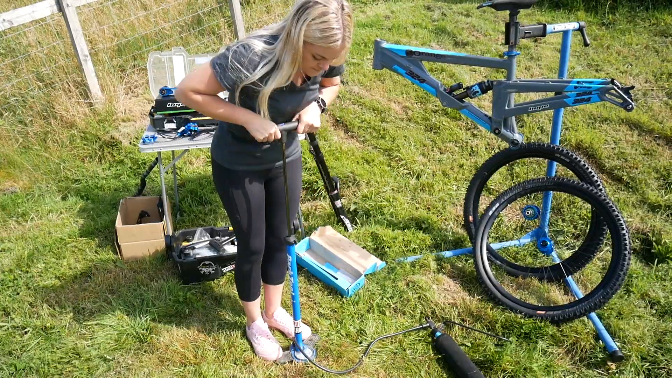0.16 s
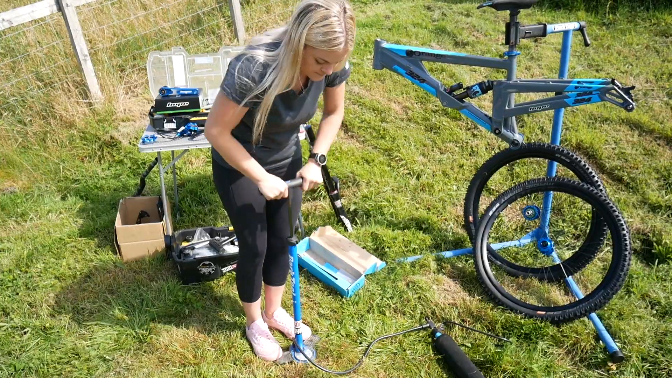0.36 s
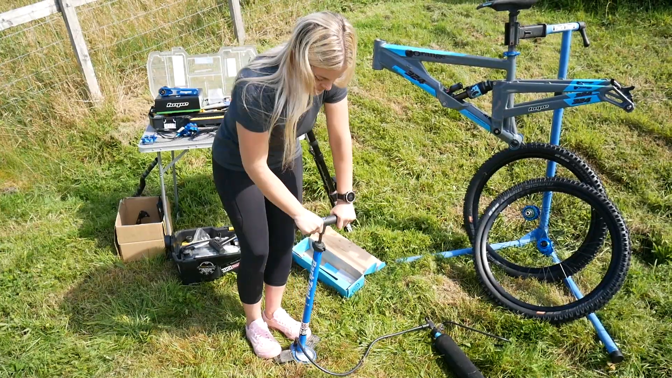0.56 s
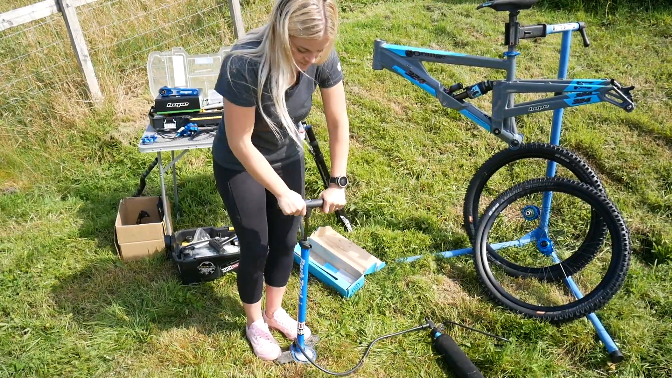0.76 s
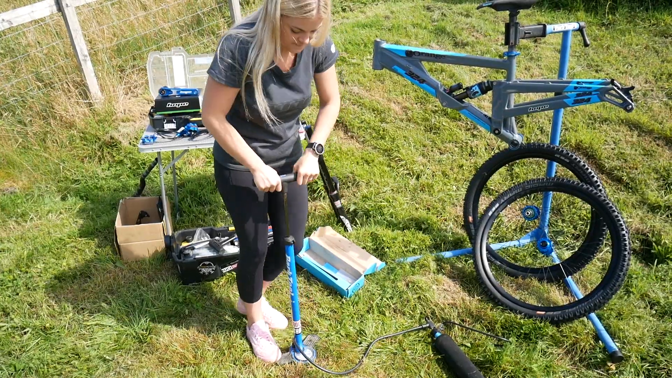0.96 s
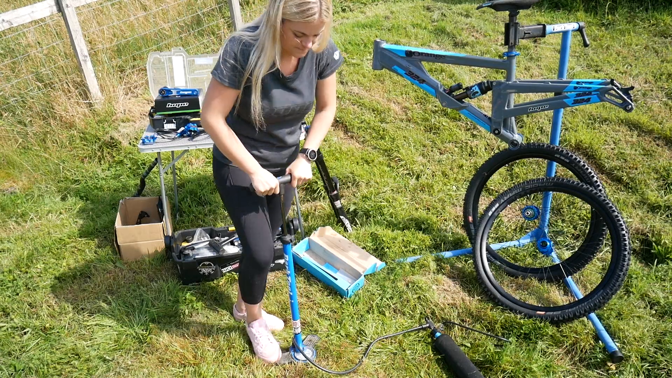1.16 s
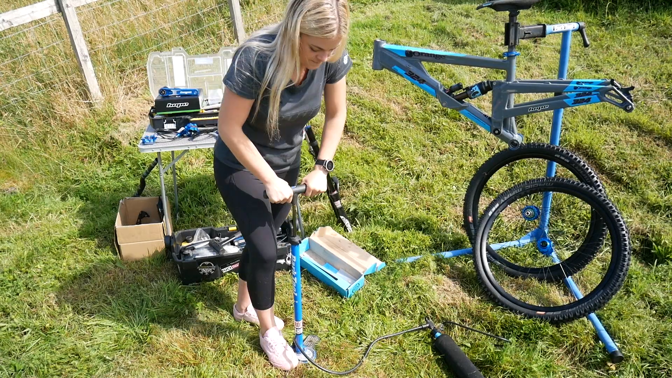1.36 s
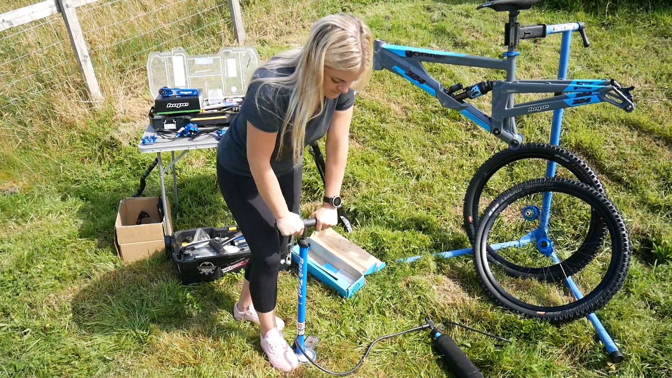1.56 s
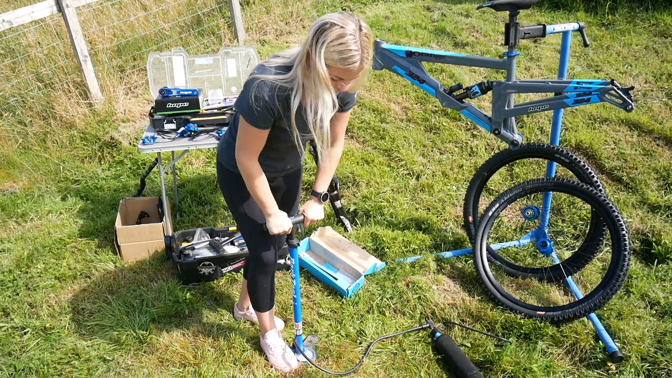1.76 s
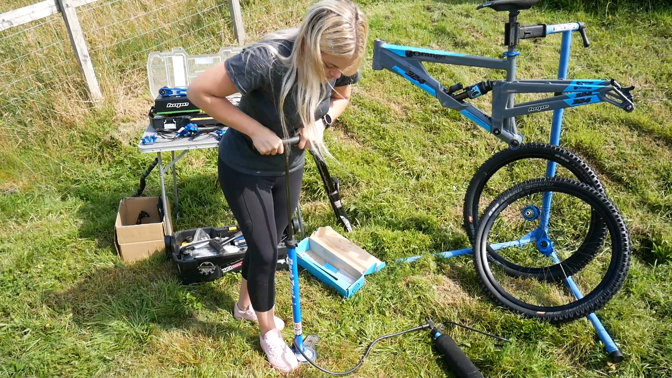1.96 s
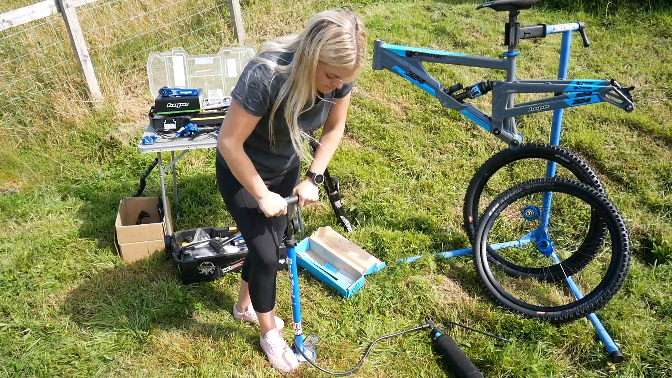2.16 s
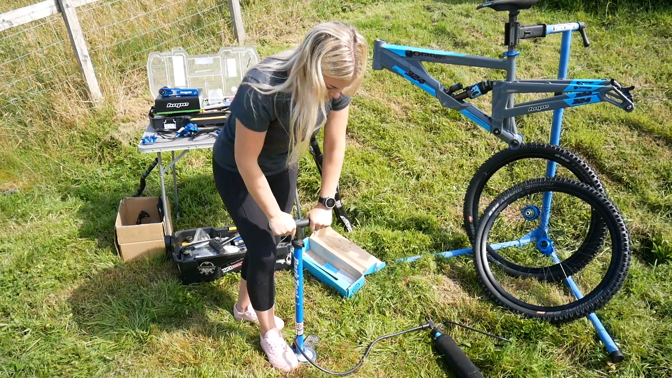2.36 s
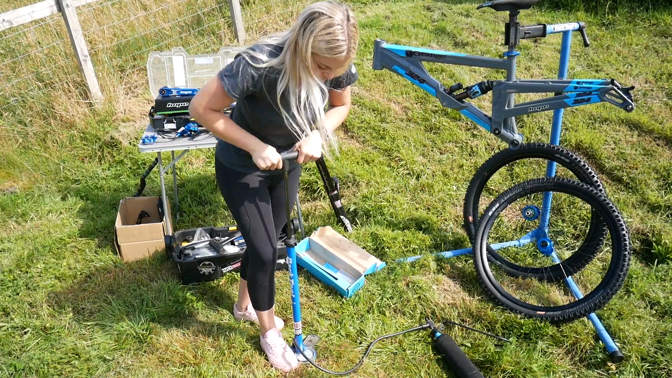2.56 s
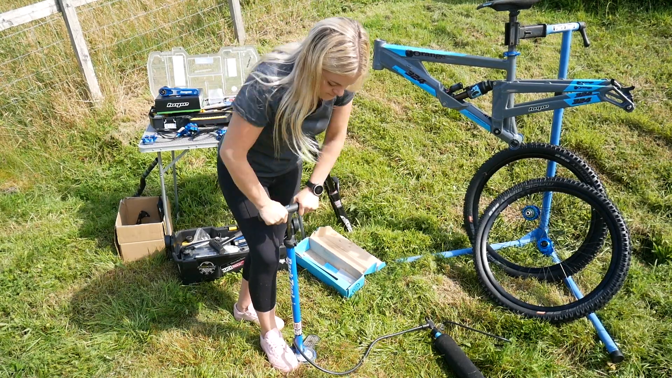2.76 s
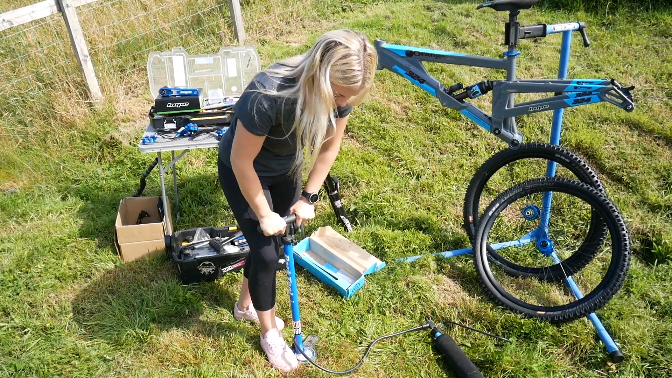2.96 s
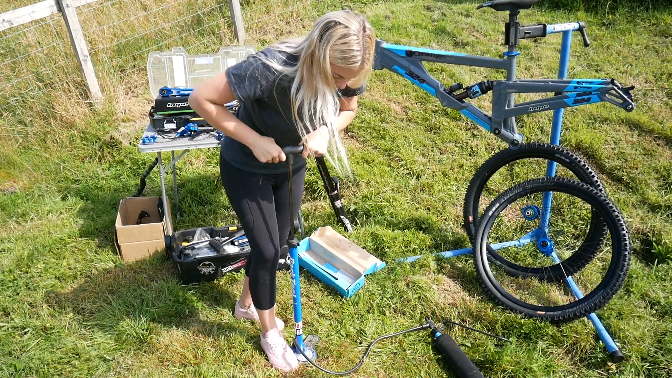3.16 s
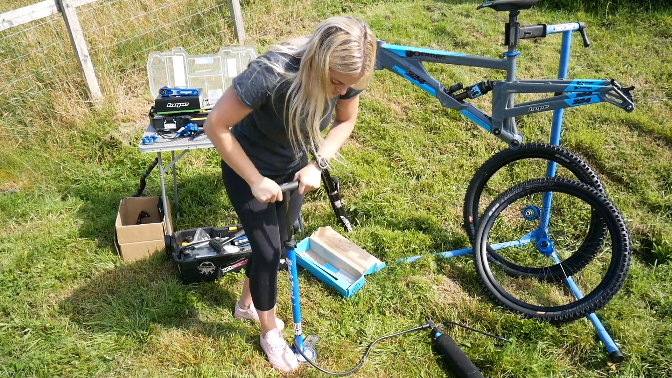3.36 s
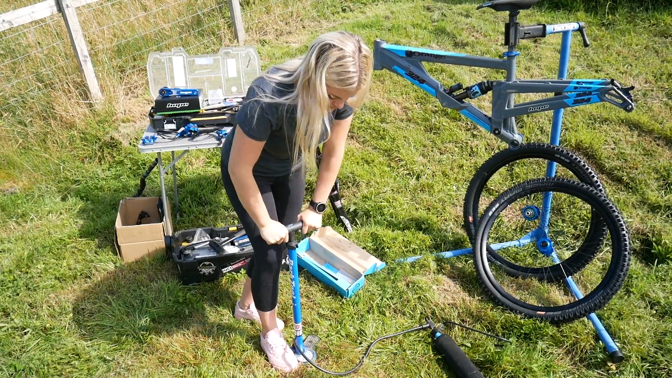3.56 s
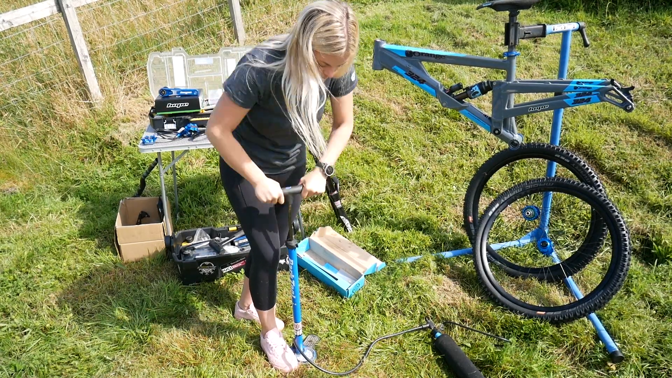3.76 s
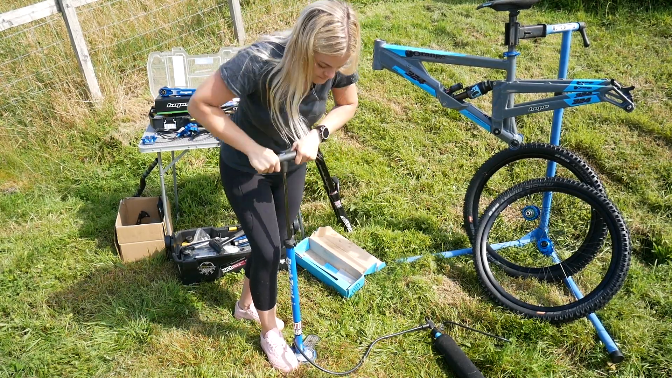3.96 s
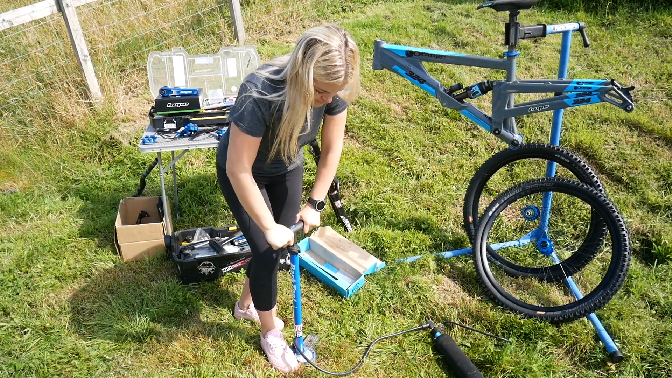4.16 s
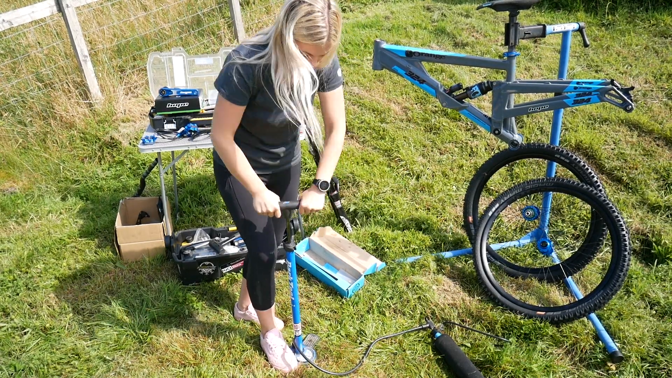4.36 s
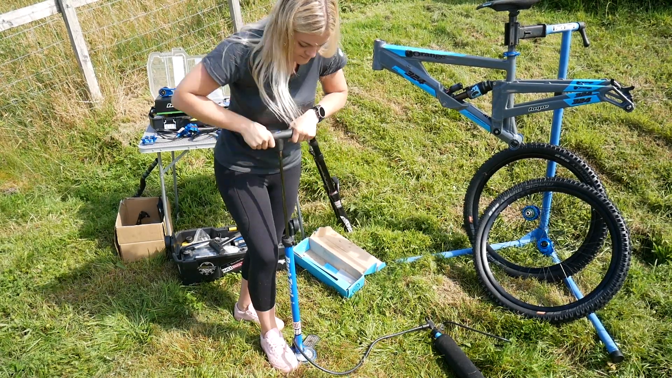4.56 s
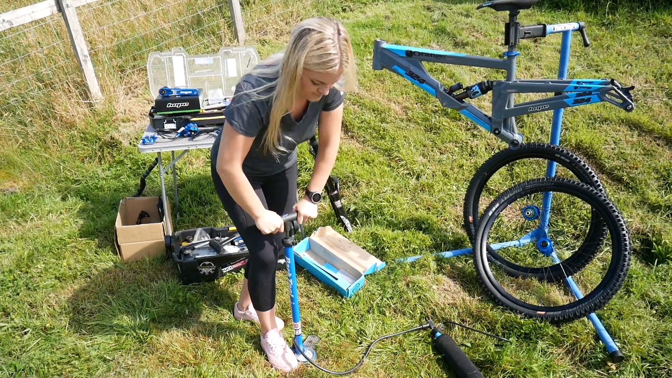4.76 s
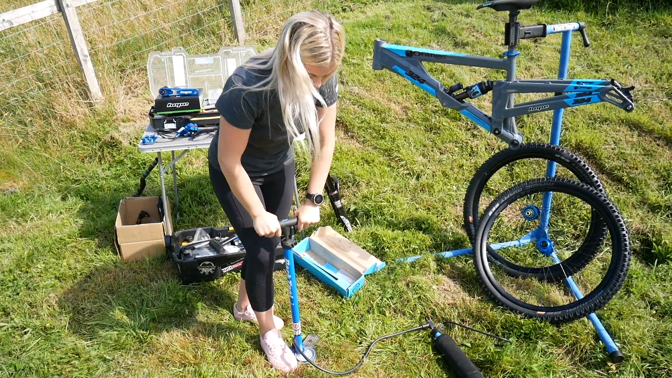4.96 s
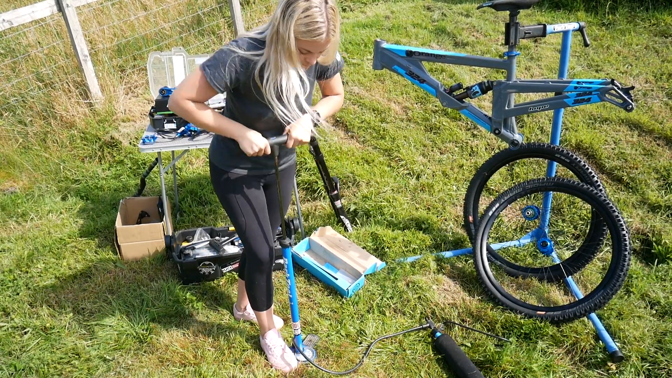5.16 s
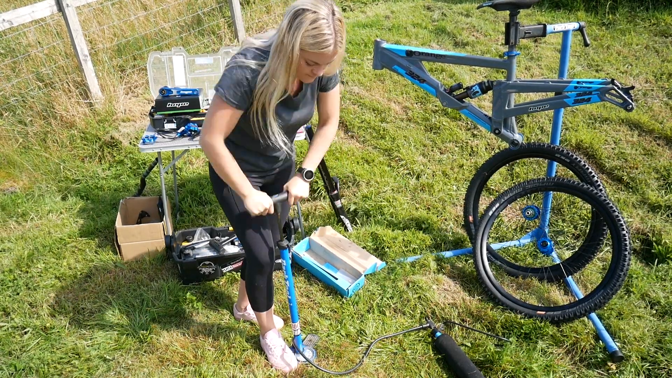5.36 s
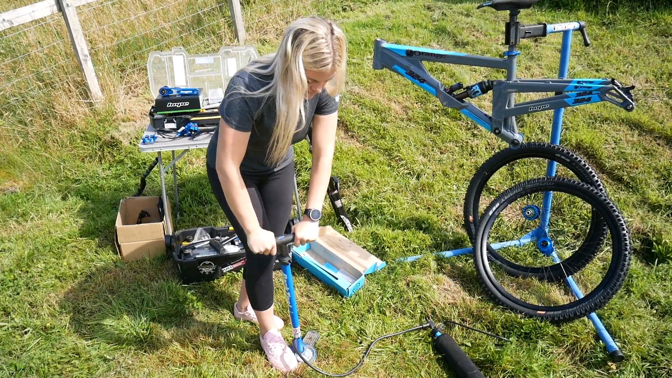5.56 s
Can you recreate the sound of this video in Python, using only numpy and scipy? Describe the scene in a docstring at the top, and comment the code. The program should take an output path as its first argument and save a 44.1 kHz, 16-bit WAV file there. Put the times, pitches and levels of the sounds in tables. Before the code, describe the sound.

A floor pump is worked on grass for about 5.6 seconds, heard close in stereo, with a dry sound and barely any reflections. Each stroke starts with a faint scuff and soft intake of air, then a push of airy hiss with a slightly rising jet tone. Late in each push the valve squeaks, around 2 kHz and falling, for 0.05 to 0.15 seconds: at about 0.47, 1.55, 2.2, 2.8, 3.45, 4.1, 4.75 and 5.4. The first two are fairly clean; the third turns fluttery at its end, and the later ones are rougher and buzzing, some settling into a cleaner note. Thin whistles rise from the squeaks at 0.47 and 2.2. The barrel rings faintly after pushes. Small knocks and clicks fall near 0.55, 1.35, 1.65, 3.7 and 4.9, with tiny low gulps after some strokes. Behind lie a quiet outdoor rush and a faint wavering low hum.

```python
"""Air is drawn in with a soft scuff as a floor pump is lifted on a lawn, then pushed out in eight quick strokes.
Each push is coloured noise with a climbing jet tone; late in it a swinging valve lip squeaks, clean or fluttering,
and two squeaks sprout thin whistles. The open valve makes the barrel ring; damped modes give knocks where the piston
hits its stop, and short low sines are the valve's gulps. Behind lie a soft outdoor rush and a faint hum."""
import sys
import numpy as np
from scipy import signal
from scipy.fft import rfft, irfft, next_fast_len
from scipy.io import wavfile
from scipy.ndimage import map_coordinates

SR = 44100
rng = np.random.default_rng(int(sys.argv[2]) if len(sys.argv) > 2 else 0)


def file_out(sig):
    """Save sig as 16-bit WAV at sys.argv[1]."""
    # one column per channel
    cols = np.atleast_2d(sig).T
    # limit, then scale
    lim = np.clip(cols, -1, 1)
    pcm = np.round(lim * 32767).astype(np.int16)
    wavfile.write(sys.argv[1], SR, pcm)


N = 247401

# valve squeaks, one a push; the lip settles as the pressure evens out: start_s, end_s, first_pitch_hz,
# settled_pitch_hz, settling_s, first_level_db, settled_level_db (both before the tone trim), first_flutter (0-1),
# later_flutter (0-1), release_s, release_droop_hz, overtone_offset_db
SQUEAKS = [(.471, 0.545, 2295, 2095, 0.023, -18, -22.5, 0.12, 0.04, 0.015, 27, -5),
           (1.549, 1.652, 2154, 1982, .045, -21, -19.5, 0.09, 0.04, 0.0024, -2, -2.5),
           (2.212, 2.347, 2110, 1838, 0.048, -15.5, -31.5, 0.01, 0.13, 0.0092, 2, 2.5),
           (2.795, 2.93, 2122, 1904, 0.0048, -17.5, -21, 0.41, 0.61, 0.031, 250, 1),
           (3.442, 3.491, 2102, 1897, 0.0057, -18.5, -23.5, 0.18, 0.87, 0.0083, 0, -4),
           (4.08, 4.232, 2276, 1799, .011, -17, -27, 0.11, 0.7, .032, 153, 3),
           (4.745, 4.804, 2027, 1870, 0.015, -16.5, -22.5, 0.19, 0.76, 0.0078, 0, 5.5),
           (5.425, 5.57, 2146, 1803, 0.012, -12, -26, 0.18, 0.48, 0.019, 34, 7)]
# downward strokes: start_s, end_s, hiss_level_db (before turbulence), barrel_ring_level_db
PUSHES = [(0.287, 0.495, -50.5, -47.5), (1.464, 1.677, -60.5, -72), (2.106, 2.319, -47, -51.5),
          (2.705, 2.906, -45.5, -51.5), (3.34, 3.501, -45, -45.5), (3.982, 4.202, -47, -52.5),
          (4.647, 4.811, -45, -44), (5.311, 5.528, -46, -61.5)]
# colour of air in the pump: frequency_hz, relative_density_db
HISS_COLOUR = [(500, -14.5), (1200, -6), (2500, -1.5), (4600, -3), (5900, -8.5), (7400, 1.5), (8600, -8),
               (10200, -10), (11800, -12), (14400, -18.5), (15300, -35.5)]
# left-right likeness of near air: frequency_hz, coherence (-1 to 1)
NEAR_LIKENESS = [(600, 0), (1400, 0.78), (3000, 1), (5000, 0.9), (7000, 0.15), (15000, 0.034)]


def amp(db):
    """Decibels to gain."""
    return 10 ** (np.asarray(db) / 20)


def unit(x):
    """x at rms 1."""
    return x / np.sqrt(np.mean(x ** 2) + 1e-20)


def along(points, hz):
    """(Hz, value) points read on a log frequency axis."""
    f, v = np.transpose(points)
    return np.interp(np.log(hz + 1), np.log(f + 1), v)


def clock():
    """The time of every sample in seconds."""
    return np.arange(N) / SR


def gate(t, start, end, rise, fall):
    """Near 1 from start to end, with soft edges."""
    return (1 + np.tanh((t - start) / rise)) * (1 + np.tanh((end - t) / fall)) / 4


def wobble(rate, size):
    """A smooth random curve, rate knots a second."""
    knots = rng.standard_normal(int(size * rate / SR) + 4)
    return map_coordinates(knots, [np.arange(size) * rate / SR])


def band(centre, width):
    """Narrow noise around a moving centre frequency; width is the knot rate of its two random envelopes."""
    phase = 2 * np.pi * np.cumsum(centre) / SR
    return wobble(width, len(phase)) * np.sin(phase) + wobble(width, len(phase)) * np.cos(phase)


def filtered(x, response):
    """x shaped by a gain that depends on frequency."""
    m = next_fast_len(N + SR // 2)
    return irfft(rfft(x, m) * response(np.fft.rfftfreq(m, 1 / SR)), m)[..., :N]


def rush(spectrum, alike):
    """Coloured stereo noise whose middle has rms 1; the side signal sets how alike left and right are."""
    def mid_side_gain(hz):
        turn = np.arccos(np.clip(along(alike, hz), -.9, 1)) / 2
        return amp(along(spectrum, hz)) * [np.ones_like(hz), np.tan(turn)]
    mid, side = filtered(rng.standard_normal((2, N)), mid_side_gain)
    return np.array([mid + side, mid - side]) / mid.std()


def add(track, s, sound):
    """Mix a sound in at time s."""
    part = track[..., round(s * SR):][..., :sound.shape[-1]]
    part += sound[..., :part.shape[-1]]


def valve():
    """The valve lip squeaks once late in each push; two thin whistles branch off."""
    lead_in_s = .01  # squeak() starts its clock this much early
    out = np.zeros((2, N))
    for row in SQUEAKS:
        add(out, row[0] - lead_in_s, squeak(row))
    return out + whistles()


def squeak(row, beat_hz=410, second_db=-4, half_db=-35, spit_db=-12, rasp_db=-19, build_s=.024,
           follow=0.6, calm_s=0.076, tone_db=0.57):
    """The valve lip swings at one pitch; when it flutters, a second mode beats against it and both grow unsteady."""
    # overtones from the octave up: level_db (before offsets), right_lead_rad
    overtones = [(-29.5, 0.25), (-41.5, 1.36), (-37.5, 1.4), (-49.5, 1.1), (-52.5, 1.18), (-54, 1.8)]
    jitter_hz, shimmer_db, flicker_db, lowest_hz = 70, 4, 3.5, 1690
    start, end, *_, edge_db = row
    t = np.arange(start - .01, end + .02, 1 / SR)
    pitch, db, flutter = lip_motion(row, t)
    # the flutter is ragged while the flow is fast and settles towards a plain beat late in a long squeak
    ragged = flutter * np.interp(t - start, [calm_s, calm_s + 0.018], [1, .35])
    ports = np.array([[-1], [1]]) / 2  # left, right

    def chance(rate):
        return wobble(rate, len(t))

    unsteady_hz = pitch + 5 * chance(149.6) + jitter_hz * ragged * chance(598)
    phase = 2 * np.pi * np.cumsum(unsteady_hz) / SR
    beat = 2 * np.pi * np.cumsum(beat_hz + 160 * ragged * chance(247.7)) / SR
    second = flutter * amp(second_db + shimmer_db * ragged * chance(290))
    shimmer = amp(shimmer_db * ragged * chance(393.6) + .5 * chance(99))
    lip = shimmer * np.sin(phase + 0.14 * ports) + second * np.sin(phase + beat)

    # ragged closures spit a narrow squeal near the octave, with a weaker rasp around it
    bursts = unit(amp(flicker_db / 2 * chance(350)))
    spit = amp(spit_db) * band(1.95 * pitch, 549)
    rasp = amp(rasp_db) * (band(1.55 * pitch, 1300) + .5 * band(3 * pitch, 6000))
    lip += ragged * bursts * (spit + rasp)
    # the valve body radiates little below its lowest resonance
    body = signal.cheby1(6, .5, lowest_hz, "highpass", fs=SR, output="sos")
    lip = signal.sosfilt(body, lip)

    # as the swing builds the lip slaps its seat: overtones that change less in level than the tone
    swing = phase + second * np.sin(beat) + .06 * chance(450)
    slap = 0
    for k, (level, lead) in enumerate(overtones, 2):
        slap = slap + amp(level + flicker_db * chance(58.0)) * np.sin(k * swing + lead * ports)
    # alternate swings differ in size, which puts weak lines halfway
    halves = .5 * np.sin(phase / 2) + np.sin(3 * phase / 2) + 0.65 * np.sin(5 * phase / 2)
    slap += np.sqrt(ragged) * amp(half_db + flicker_db * chance(60)) * halves

    build = np.clip((t - start) / build_s, 0, 1)
    tone = amp(db + tone_db) * lip / np.sqrt(1 + second ** 2)
    sound = tone + amp(edge_db + follow * db) * build * slap
    return np.sqrt(2) * sound * gate(t, start, end, 0.00098, 0.0029)


def lip_motion(row, t):
    """Pitch, level and flutter of one squeak: it settles, may lock or chatter, and shifts as the flow stops."""
    # the lip locks into a cleaner note: time_s, pitch_hz (centre of the sway), level_db
    locks = [(2.832, 2114, -14.5), (4.119, 1984, -21), (5.513, 1816, -36.5)]
    # or it chatters as the piston nears the bottom: middle_s, level_db, flutter (0-1)
    chatters = [(1.641, -24.5, 0.48), (2.327, -24, .85)]
    lock_s, sway_hz, sway_period_s = .004, 27.2, .072  # the locked note dips and recovers
    flutter_left = 0.2  # share of the flutter left just after locking
    chatter_half_s, chatter_rise_hz = 0.012, 52.3
    flutter_change_s, release_loss_db = 0.038, 20
    (start, end, first_hz, settled_hz, settle_s, first_db, settled_db,
     first_flutter, later_flutter, release_s, droop_hz, _) = row
    age = np.maximum(t - start, 0)
    settled = 1 - np.exp(-age / settle_s)
    pitch = first_hz + (settled_hz - first_hz) * settled
    db = first_db + (settled_db - first_db) * settled ** 2
    flutter = np.interp(age, [0, flutter_change_s], [first_flutter, later_flutter])
    for s, lock_hz, lock_db in locks:
        if start < s < end:
            locked = (1 + np.tanh((t - s) / lock_s)) / 2
            sway = sway_hz * np.cos(2 * np.pi * (t - s) / sway_period_s)
            pitch += locked * (lock_hz + sway - pitch)
            db += locked * (lock_db - db)
            remaining = flutter_left * np.exp(-np.abs(t - s) / flutter_change_s)
            flutter *= 1 - locked * (1 - remaining)
    for s, chatter_db, depth in chatters:
        chatter = gate(t, s - chatter_half_s, s + chatter_half_s, .004, .006)
        pitch += chatter * chatter_rise_hz
        db += chatter * (chatter_db - db)
        flutter += chatter * (depth - flutter)
    release = np.interp(t, [end - release_s, end], [0, 1])
    return pitch - droop_hz * release, db - release_loss_db * release ** 2, np.clip(flutter, 0, 1)


def whistles(bend=2.0, peak_share=0.22, onset_db=-5, fade_db=-16):
    """A second, thin tone climbs away from the squeak, swells briefly and fades."""
    # rising whistles: start_s, end_s, first_pitch_hz, last_pitch_hz, peak_level_db (rms)
    whistle_rows = [(0.465, 0.517, 2556, 3280, -36), (2.205, 2.27, 2420, 4620, -36)]
    t = clock()
    out = np.zeros(N)
    for start, end, first_hz, last_hz, db in whistle_rows:
        progress = np.interp(t, [start, end], [0, 1])
        pitch = first_hz + (last_hz - first_hz) * progress ** bend + 50 * wobble(400, N)
        phase = 2 * np.pi * np.cumsum(pitch) / SR
        swell_db = np.interp(progress, [0, peak_share, 1], [onset_db, 0, fade_db])
        out += amp(db + swell_db) * gate(t, start, end, .003, .003) * np.sqrt(2) * np.sin(phase)
    return out


def pushes(rise=0.02, fall=0.029, puff_s=0.061, puff_hz=780, jet_hz=7500, climb=2.6, jet_db=-5):
    """Air hisses past the piston; a hollow puff and a high jet tone climb as the chamber shortens."""
    puff_db = -7  # against the hiss
    t = clock()
    hiss, puff, travel = np.zeros((3, N))
    for start, end, hiss_db, _ in PUSHES:
        hiss += amp(hiss_db) * gate(t, start, end, rise, fall)
        puff += amp(hiss_db + puff_db) * gate(t, start, start + puff_s, rise, 0.0227)
        # travel is the time since the push began, in seconds
        travel += (t - start) * gate(t, start - .05, end + .05, 0.00504, .005)
    jet_noise = np.array([band(jet_hz * (1 + climb * travel), 1500) for port in range(2)])
    jet = amp(jet_db) * np.exp(-4 * travel) * jet_noise
    turbulence = amp(2.5 * wobble(45, N))
    air = turbulence * rush(HISS_COLOUR, NEAR_LIKENESS) + jet
    return hiss * air + puff * band(puff_hz * (1 + 2 * climb * travel), 650)


def barrel(linger=0.055, fade=0.069):
    """Air streaming through the open valve makes the barrel sing softly, and lingers after the push."""
    # air column resonances: frequency_hz, relative_level_db, t60_s
    column_modes = [(1840, 7, 0.17), (2123, 12, .1), (3215, 12.5, 0.33), (4390, 8, 0.203),
                    (7600, -12.5, .14), (8230, -6, 0.121), (8500, -5, .14), (10450, 1, .2)]
    airy = 1.2  # plain air mixed with the ringing at rms 1
    t = np.arange(SR // 2) / SR
    ring = sum(amp(db - 60 * t / t60) * np.sin(2 * np.pi * hz * t) for hz, db, t60 in column_modes)
    ringing = signal.fftconvolve(rush(HISS_COLOUR, NEAR_LIKENESS), ring[None], axes=1)[:, :N]
    song = unit(ringing) + airy * rush(HISS_COLOUR, NEAR_LIKENESS)
    level = np.zeros(N)
    for (opens, *_), (_, end, _, db) in zip(SQUEAKS, PUSHES):
        level += amp(db) * gate(clock(), opens, end + linger, 0.011, fade)
    return unit(song) * level


def lifts(rise=0.02, fall=0.034, grain_db=3):
    """Air is sucked in softly while the rising rod scuffs in its guide."""
    # upward strokes: middle_s, intake_level_db, scuff_length_s, scuff_level_db
    lift_rows = [(0.104, -53, 0.014, -41), (1.0, -63, 0.19, -65), (1.923, -55.5, 0.041, -49),
                 (2.567, -55, 0.049, -46.5), (3.141, -54, 0.047, -48.5), (3.831, -55.5, 0.062, -50),
                 (4.495, -55, 0.041, -54), (5.128, -53, 0.062, -53.5)]
    # colours of intake and scuff: frequency_hz, relative_density_db
    intake_colour = [(500, -17), (1250, -1.5), (1550, -8.5), (2200, 0.5), (3600, -8), (6000, -11.5),
                     (7400, -9), (8800, -19.5), (12200, -20.5), (14000, -48.5)]
    scuff_colour = [(1200, -28), (2200, -2.5), (2600, 0), (3300, -15), (5000, -16.5), (9000, -38)]
    intake_s = 0.15
    t = clock()
    intake, rub = np.zeros((2, N))
    for s, intake_db, length, scuff_db in lift_rows:
        intake += amp(intake_db) * gate(t, s - intake_s / 2, s + intake_s / 2, rise, fall)
        rub += amp(scuff_db) * np.exp(-(2 * (t - s) / length) ** 2)
    grain = unit(amp(grain_db * wobble(400, N)))
    return intake * rush(intake_colour, NEAR_LIKENESS) + rub * grain * rush(scuff_colour, NEAR_LIKENESS)


def knocks(attack=0.0013, click_t60=0.031, thud_db=6, click_db=-6, low_hz=120):
    """Each knock is a dead thud of the pump's foot with a short click on top; the small foot radiates little bass."""
    # piston and handle knocks: time_s, thud_level_db, click_level_db (both before trims)
    knock_rows = [(0.549, -49, -24), (1.343, -62, -33), (1.362, -38, -34.5), (1.65, -33, -30),
                  (3.699, -57, -39.5), (4.872, -31, -26.5), (4.988, -52, -36)]
    # the pump's foot on the turf: frequency_hz, relative_level_db, t60_s
    foot_modes = [(199.4, -16, 0.087), (387, 13.5, 0.012), (620, 1.5, 0.015), (930, -4, 0.03)]
    # colour of the click: frequency_hz, relative_density_db
    click_colour = [(400, -32), (1100, -1), (2000, 0), (3300, -0.5), (6000, -25), (15000, -41.5)]
    t = np.arange(SR // 5) / SR
    onset = 1 - np.exp(-t / attack)
    ring = onset * sum(amp(level - 60 * t / t60) * np.sin(2 * np.pi * hz * t) for hz, level, t60 in foot_modes)
    thuds, clicks = np.zeros((2, N))
    for s, db, bright_db in knock_rows:
        add(thuds, s, amp(db + thud_db) * ring)
        add(clicks, s, amp(bright_db + click_db - 60 * t / click_t60) * onset)
    thuds = signal.sosfilt(signal.butter(2, low_hz, "highpass", fs=SR, output="sos"), thuds)
    left_right_db = [[-1.5], [1.5]]
    return thuds * amp(left_right_db) + clicks * rush(click_colour, NEAR_LIKENESS)


def gulps(length=0.018, fall=0.0062):
    """A few low swings of the valve as it flutters shut or reseats."""
    # short low notes: start_s, pitch_hz, peak_level_db (before the soft edges)
    gulp_rows = [(1.631, 446, -40), (2.32, 405, -40), (2.442, 316, -50), (3.019, 326, -41),
                 (3.699, 330, -39.5), (4.989, 320, -37)]
    t = np.arange(SR // 10) / SR
    out = np.zeros(N)
    for s, hz, db in gulp_rows:
        add(out, s, amp(db) * np.sin(2 * np.pi * hz * t) * gate(t, 0.00091, length, 0.0011, fall))
    return out


def garden(x, t60=0.27, wet_db=-25):
    """Lawn, fence and bicycle scatter a weak short tail, partly shared by left and right."""
    t = np.arange(SR // 3) / SR
    scatter = rng.standard_normal(len(t)) + rng.standard_normal((2, len(t)))
    tail = scatter * amp(-60 * t / t60) * (t > .003)
    return amp(wet_db) * signal.fftconvolve(x, tail / np.linalg.norm(tail[0]), axes=1)[:, :N]


def background(rush_db=-57.5, hum_db=-1, waver_db=1.0, drift_hz=3.54):
    """A soft outdoor rush of noise and a faint sine hum, wavering in pitch and level."""
    # hum: pitch_hz, level_db (rms, before the trim)
    hum_rows = [(226.1, -61.5)]
    # colour of the outdoor rush: frequency_hz, relative_density_db
    outdoor_colour = [(15, -97), (25, -37), (139, -12), (159, -11.5), (198, -10), (226, -8.5), (338, -10.5),
                      (419, -8.5), (466, -11), (548, -14), (1440, -24.5), (2670, -18.5), (4570, -25.5),
                      (5970, -32), (15300, -41)]
    # left-right likeness of the far rush: frequency_hz, coherence (-1 to 1)
    far_likeness = [(100, -0.58), (700, -0.62), (1300, -0.55), (2400, 0.91), (4400, 0.86), (8000, .1)]
    hz, db = hum_rows[0]
    phase = 2 * np.pi * np.cumsum(hz + drift_hz * wobble(31, N)) / SR
    hum_level = amp(db + hum_db + waver_db * wobble(5.1, N))
    hum = np.sqrt(2) * hum_level * np.sin(phase + np.array([[0], [.9]]))  # right leads by 0.9 rad
    return hum + amp(rush_db + wobble(4.76, N)) * rush(outdoor_colour, far_likeness)


def scene():
    """The pump, its short outdoor tail and its surroundings."""
    pump = valve() + pushes() + barrel() + lifts() + knocks() + gulps()
    return pump + garden(pump) + background()


def record(dry):
    """The two microphone ports differ in colour; nothing is kept above the band limit."""
    # port colour, split evenly between the two sides: frequency_hz, left_over_right_db
    port_colour = [(250, -2.5), (1000, .5), (2000, 0), (9000, .5), (12500, -7.5)]
    top_hz = 15400
    sides = np.array([[1], [-1]]) / 2
    return filtered(dry, lambda hz: amp(along(port_colour, hz) * sides) * (hz < top_hz))


dry = scene()
out = record(dry)
file_out(out)
```